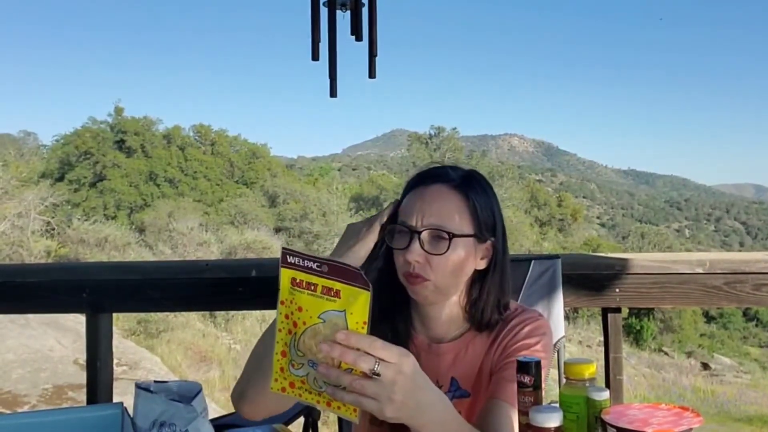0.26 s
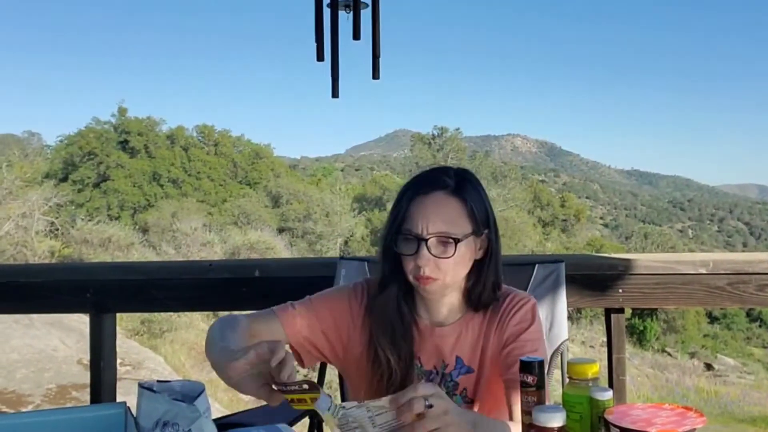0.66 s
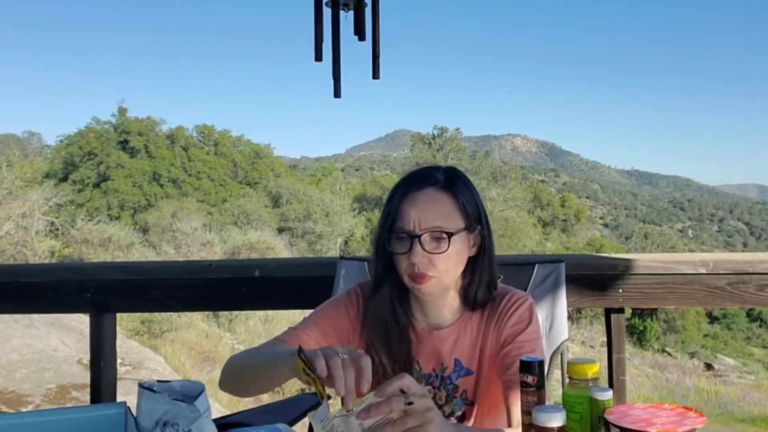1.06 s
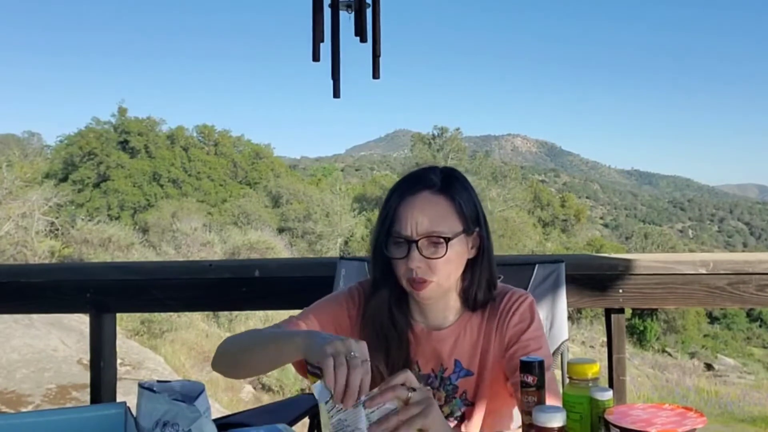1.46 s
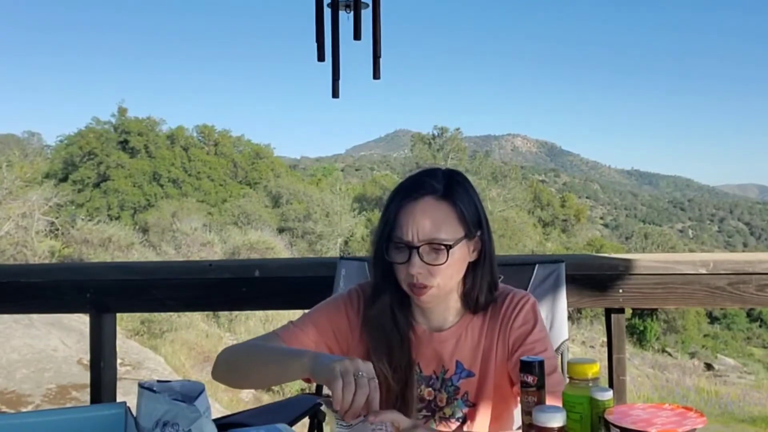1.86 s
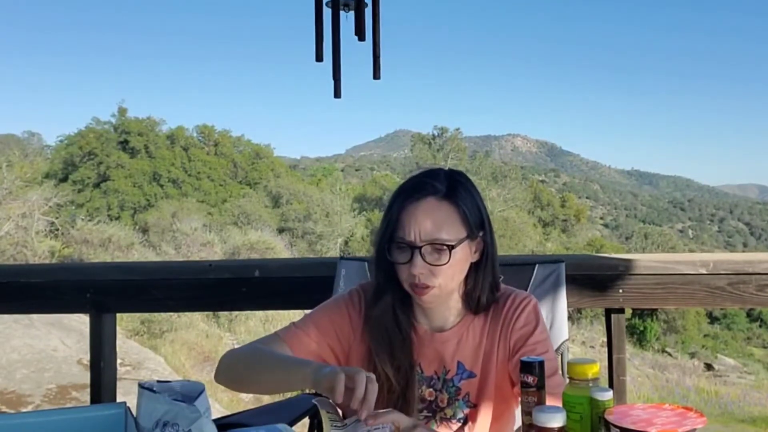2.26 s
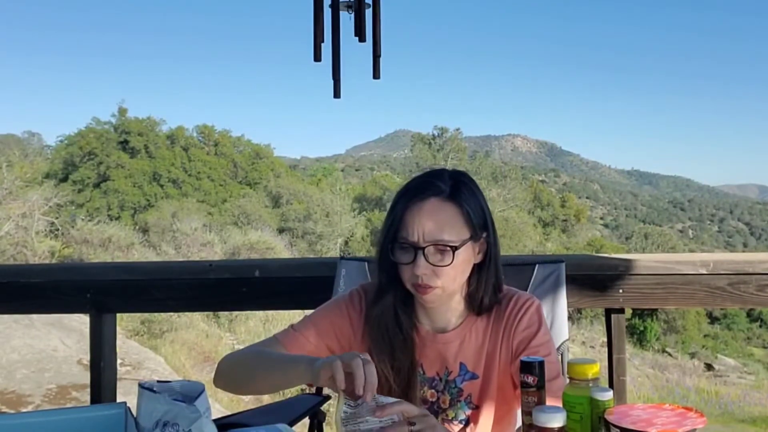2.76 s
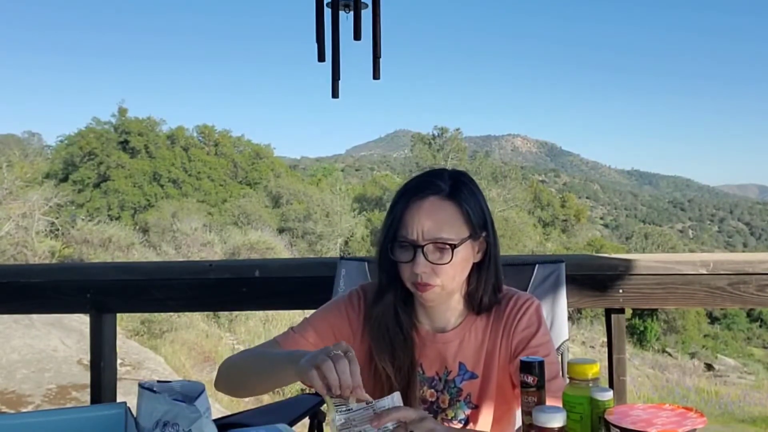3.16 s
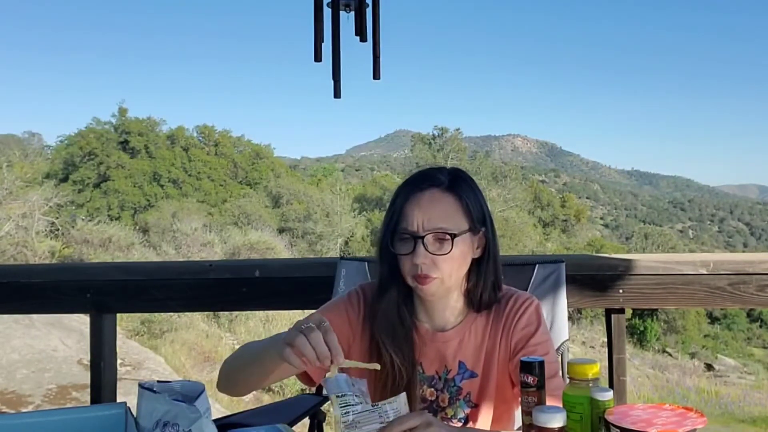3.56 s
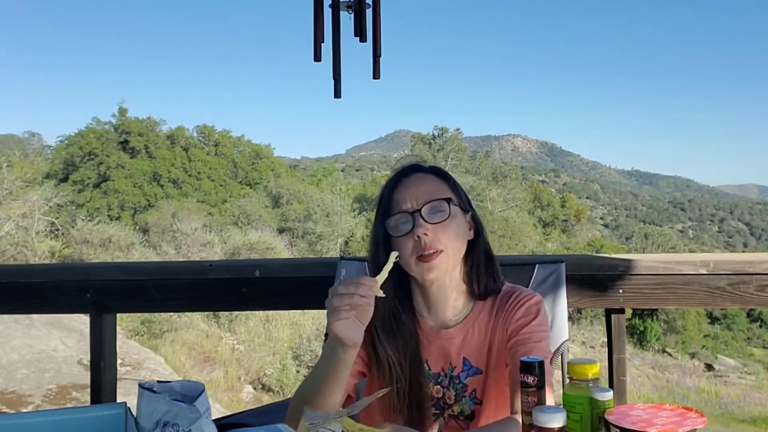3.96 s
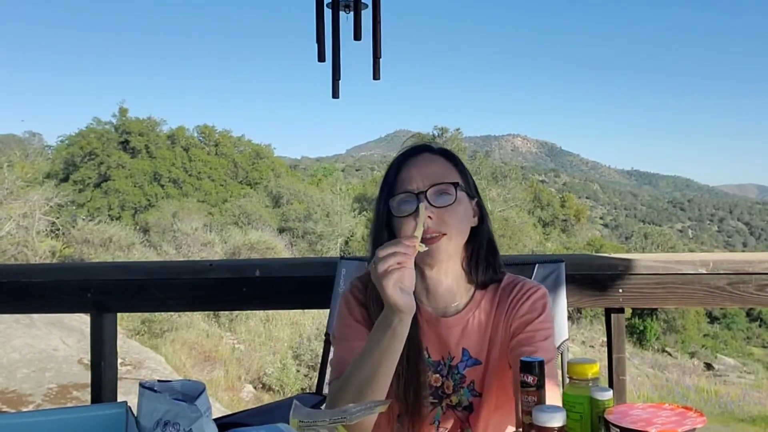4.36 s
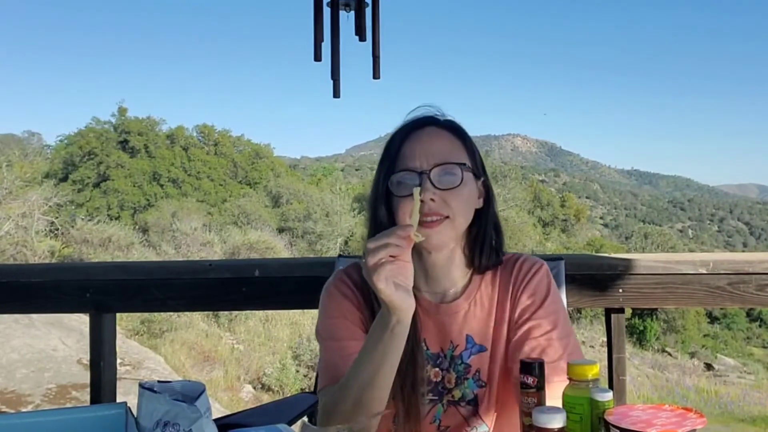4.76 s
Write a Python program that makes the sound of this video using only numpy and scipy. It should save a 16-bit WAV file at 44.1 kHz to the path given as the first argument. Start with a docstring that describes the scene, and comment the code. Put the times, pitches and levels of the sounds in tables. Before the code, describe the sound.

Close, dry crinkling of a snack bag comes in short uneven strokes, busiest around two seconds, with hard clicks and brief papery rings. After a quieter gap, soft thuds and rattles mark the bag being bumped and put down. Low, lumpy wind rumble and quiet open air run throughout, a far bird chirps thinly three times, and the porch adds a short early reflection.

```python
"""A porch in open country, heard by a two-port microphone: shaped noise makes the steady air, the microphone's
own hiss and the light wind. From 0.6 s fingers work a snack out of a stiff plastic bag about a metre away: strokes
rustle in swarms of tiny buckles and crackle, dull thuds ring the bag's modes, creases snap as damped clicks, taut
spots ping. From 1.4 s a small bird chirps three times far off, a wavering sine that slides up.
Bumping and setting down the bag go on to the last thud at 4.9 s, over the same wind and air."""
import sys
import numpy as np
from scipy import signal
from scipy.fft import rfft, irfft
from scipy.io import wavfile
from scipy.ndimage import uniform_filter1d

SR = 44100
rng = np.random.default_rng(int(sys.argv[2]) if len(sys.argv) > 2 else 0)


def unload_wav(signal):
    """Save mono or channel-first audio to the path in sys.argv[1] as 16-bit WAV at rate SR, clipped to [-1, 1]."""
    wavfile.write(
        sys.argv[1],
        SR,
        np.round(np.clip(np.atleast_2d(signal).T, -1, 1) * 32767).astype(np.int16),
    )


N = 221025
TIME = np.arange(N) / SR
FREQ = np.maximum(np.fft.rfftfreq(N, 1 / SR), 1)
TOP_HZ = 16000  # highest pitch of the film, and where the microphone's top is cut
PORTS = np.array([[1], [-1]])  # sign of a side signal at the left and the right port


def undb(db):
    """Decibels to gain."""
    return 10 ** (np.asarray(db) / 20)


def unit(x):
    """Scale to rms 1."""
    return x / np.sqrt(np.mean(x ** 2))


def decay(s, t60):
    """Exponential decay that loses 60 dB in t60 seconds."""
    return np.exp(-np.log(1000) * s / t60)


def colour(x, points):
    """Filter by a spectrum of (frequency [Hz], level [dB]) points, joined on a log frequency axis."""
    hz, db = np.transpose(points)
    gain = undb(np.interp(np.log(FREQ), np.log(hz), db))
    return irfft(rfft(x) * gain, N)


def add(out, t, x):
    """Mix the sound x into out from time t on."""
    i = int(t * SR)
    out[..., i:i + x.shape[-1]] += x[..., :N - i]


def pan(db):
    """Left and right gains for a level difference."""
    return undb(PORTS * db / 2)


def two_ports(x, apart):
    """Two ports share only a part of a sound: the common x[0] plus x[1] in opposite sign."""
    return (x[0] + apart * x[1] * PORTS) / np.sqrt(1 + apart ** 2)


def through(x, response):
    """Every channel of x through one response, at the same length."""
    return signal.fftconvolve(x, response[None])[:, :x.shape[1]]


# Steady outdoor air, with the microphone's own hiss in the treble: (frequency [Hz], relative level [dB per Hz])
AIR_AND_HISS = [(88, -59), (150, -10.5), (193, -7.5), (291, -6), (315, -9.5), (504, -6.5), (545, -10.5),
                (662, -11.5), (1060, -16.5), (1310, -20.5), (2270, -25.5), (9820, -36.5), (16000, -20.5)]


def air_and_hiss(level_db=-66, wide_hz=1200):
    """Faint steady outdoor air and microphone hiss: more alike at both ports in the bass, unrelated in the treble."""
    mid, side = (unit(colour(rng.standard_normal(N), AIR_AND_HISS)) for _ in range(2))
    side = colour(side, [(300, -8), (wide_hz, 0)])
    return (mid + side * PORTS) * undb(level_db)


# Rumble of wind on the microphone ports: (frequency [Hz], relative level [dB per Hz])
WIND_SPECTRUM = [(15, -14), (25, -5.5), (42, -0.5), (68, 1), (88, -6.5), (110, -14), (150, -27.5),
                 (250, -36.5), (600, -61.5)]
# Gusts on the ports: (time [s], hold [s], level before the wind's trim [dB], left over right [dB])
WIND_GUSTS = [(0.07, 0.41, -57, 5.5), (0.578, 0.042, -48, 0.5), (0.694, 0.096, -38, 7),
              (0.904, 0.14, -37.5, 0), (1.475, 0.063, -40, -1.5), (1.595, 0.042, -51.5, -9),
              (1.973, 0.65, -46, 5.5), (2.121, 0.067, -40, 2.5), (2.643, 0.22, -55.5, -2.5),
              (2.974, 0.019, -44.5, 6.5), (3.088, 0.04, -37.5, -0.5), (3.23, 0.095, -39, 4),
              (3.407, 0.36, -55, -4), (3.907, 0.19, -39.5, 2), (4.446, 0.13, -45.5, 7),
              (4.81, 0.24, -50.5, 0.5)]


def wind(apart=0.79, trim_db=-1, lull_db=-58.5, attack_s=0.027, release_s=0.045,
         lump_db=2.2, lumps_per_s=28, steady_size=1500):
    """Eddies buffet each port nearly on its own; gusts rise, hold and die away in lumps over a light breeze."""
    eddies = colour(two_ports(rng.standard_normal((2, N)), apart), WIND_SPECTRUM)
    # even out the noise's own swells, so that the gusts alone set the level
    eddies /= np.sqrt(uniform_filter1d(np.mean(eddies ** 2, axis=0), size=steady_size))
    power = undb(lull_db) ** 2  # the breeze between gusts
    for t, hold, db, pan_db in WIND_GUSTS:
        before = np.maximum(t - TIME, 0)
        after = np.maximum(TIME - t - hold, 0)
        swell = np.exp(-before / attack_s - after / release_s)
        power = power + (swell * undb(db) * pan(pan_db)) ** 2
    # pressure comes in lumps, dipping a little further than it rises
    lumps = np.interp(TIME * lumps_per_s, np.arange(N), rng.uniform(-1.19, 1, N)) * np.sqrt(3)
    return eddies * np.sqrt(power) * undb(trim_db + lump_db * lumps)


def facet(hz, width_hz, edge_db, edge_hz=900, size=512):
    """Click of one patch of film, of energy 1: a damped resonance plus the flat spectrum of the sharp fold."""
    f = np.maximum(np.fft.rfftfreq(size, 1 / SR), 1)
    resonance = (1 + ((f * f - hz * hz) / (f * width_hz)) ** 2) ** -2
    edge = undb(edge_db) ** 2 / (1 + (edge_hz / f) ** 2)
    cepstrum = irfft(np.log(resonance + edge))
    cepstrum[size // 2:] = 0  # causal: nothing sounds before the fold gives way
    cepstrum[0] = 0
    click = irfft(np.exp(rfft(cepstrum)))
    return click / np.linalg.norm(click)


def buckles(n, per_s, spread_db, slide):
    """Swarm of tiny buckles of very unequal size over the hiss of sliding film, scaled to rms 1."""
    chance = rng.random(n)
    size = np.minimum(rng.exponential(size=n), 4)
    pops = (chance < per_s / SR) * undb(spread_db * size) * rng.choice([-1, 1], n)
    hiss = rng.standard_normal(n)
    return unit(unit(pops + 1e-9) + slide * hiss)


def ring(modes, detune=0.027, size=4000):
    """Response of damped modes (frequency [Hz], level [dB], t60 [s]) to one push, of energy 1."""
    hz, db, t60 = np.transpose(modes)[:, :, None]
    s = np.arange(size) / SR
    hz = hz * (1 + detune * rng.standard_normal(hz.shape))  # the bag never has quite the same shape twice
    tones = np.sin(2 * np.pi * (hz * s + rng.random(hz.shape)))
    response = np.sum(undb(db) * decay(s, t60) * tones, axis=0)
    return response / np.linalg.norm(response)


def sheet(x, hz, ring_db=-13, t60=0.026, octaves=0.724, count=24):
    """The taut film around a fold rings along; the bag keeps changing shape, so its modes are new every time."""
    pitches = np.minimum(hz * 2 ** (octaves * rng.standard_normal(count)), TOP_HZ)
    modes = [(f, -abs(np.log2(f / hz)), t60) for f in pitches]
    return x + undb(ring_db) * through(x, ring(modes))


def effort_db(s, rise, fall, drop_db=14, tail=0.88):
    """Level of a swell, s seconds from its height: a rounded rise and a long fall."""
    return -drop_db * np.where(s < 0, (s / rise) ** 2, np.abs(s / fall) ** tail)


# Swells of rustling about a metre from the microphone: strokes of the fingers that crumple the film,
# except the row at 2.489 s, a faint blurred trace of the bird's call
# (time of the height [s], rise by 14 dB [s], fall by 14 dB [s], relative level [dB], pitch [Hz], sharp edge [dB])
STROKES_AND_BIRD_TRACE = [(0.649, 0.016, 0.026, -42.5, 2510, -1), (0.945, 0.026, 0.025, -49, 6230, -3),
                          (1.061, 0.015, 0.068, -62, 1920, -12), (1.188, 0.015, 0.054, -58.5, 2400, -4),
                          (1.288, 0.042, 0.091, -57.5, 2270, -8), (1.343, 0.015, 0.01, -46.5, 3610, -36),
                          (1.568, 0.016, 0.032, -53, 2120, 1), (1.656, 0.069, 0.045, -50, 2670, -18),
                          (1.79, 0.08, 0.39, -46.5, 2202, -12.5), (1.905, 0.02, 0.057, -39, 2685, -4.5),
                          (2.062, 0.056, 0.028, -46, 2400, -12), (2.382, 0.053, 0.032, -58.5, 2630, -20),
                          (2.489, 0.065, 0.37, -67.5, 2900, -1), (2.881, 0.044, 0.018, -59.5, 4240, -33),
                          (2.956, 0.045, 0.03, -45.5, 2380, -24), (3.165, 0.063, 0.1, -56, 1840, -13),
                          (3.385, 0.027, 0.096, -57, 2590, -5), (3.551, 0.11, 0.19, -65.5, 3090, 2)]


def rustle(per_s=900, spread_db=3.0, slide=0.35, apart=0.42, pan_db=1, trim_db=-4.5,
           scatter_octaves=0.634, patches=8):
    """Each swell grows and dies away as swarms of buckles in several patches of different pitch."""
    out = np.zeros((2, N))
    for t, rise, fall, db, hz, edge_db in STROKES_AND_BIRD_TRACE:
        s = np.arange(-1.5 * rise, 3.1 * fall, 1 / SR)
        effort = undb(db + trim_db + effort_db(s, rise, fall))
        width_hz = 1.73 * hz
        for pitch in hz * 2 ** np.linspace(-scatter_octaves, scatter_octaves, patches):
            swarm = two_ports([buckles(len(s), per_s / patches, spread_db, slide) for _ in range(2)], apart)
            patch = through(swarm * effort, facet(pitch, width_hz, edge_db))
            add(out, t + s[0], sheet(patch, pitch) / np.sqrt(patches))
    return out * pan(pan_db)


# What the bag rings with under rubs and blows, before detuning: (frequency [Hz], level [dB], t60 [s])
BODY_MODES = [(215.6, -8, 0.12), (265.4, -7, 0.06), (328, 3, .055), (376, 2, 0.05), (432, -9, 0.04),
              (541, -15, 0.07), (660, -7, .03), (980, -5, 0.044), (1210, -4, 0.06), (1350, -7, 0.06),
              (1900, -3, 0.04)]


def shaking(rustling, level_db=-13):
    """Rubbing also shakes the bag as a whole: noise that follows the rustle's level drives the body modes."""
    pressure = np.sqrt(np.abs(uniform_filter1d(rustling[0] ** 2, size=400)))
    force = pressure * rng.standard_normal(N)
    return undb(level_db) * through(force[None], ring(BODY_MODES))


def crackles(per_s=110, octaves=0.55, width_share=0.082, spread_db=2.5, pan_spread_db=3, pan_db=1.0,
             soften_db=-24, count=40, size=2000):
    """Lesser clicks, as of creases giving way, at uneven steps of each swell, each with its own pitch and direction."""
    out = np.zeros((2, N))
    for t, rise, fall, db, hz, edge_db in STROKES_AND_BIRD_TRACE:
        times = (np.arange(count) + rng.random(count)) / per_s - rise
        for s, (loud, high, side) in zip(times, rng.standard_normal((count, 3))):
            pitch = min(hz * 2 ** (octaves * high), TOP_HZ)
            click = facet(pitch, width_share * pitch, edge_db + soften_db, size=size)
            level_db = db + effort_db(s, rise, fall) + spread_db * loud
            gain = np.sqrt(SR / 1000) * undb(level_db)  # level over one millisecond
            add(out, t + s, click * gain * pan(pan_db + pan_spread_db * side))
    return out


# Blows on the bag and what lies under it: (time [s], relative thud level [dB], rattle of the contents [dB],
# rattle's fall by 18 dB [s], rattle pitch [Hz])
BAG_BLOWS = [(0.641, -49, -61, 0.11, 1340), (0.8355, -35, -38.5, 0.038, 1750),
             (1.286, -54, -66, 0.026, 1000), (1.622, -42, -62, 0.15, 1310), (1.904, -57, -66, 0.017, 1200),
             (2.953, -43.5, -52.5, 0.046, 1340), (3.18, -46.5, -59.5, 0.031, 1320),
             (4.417, -34, -42, 0.067, 1900), (4.453, -38.5, -47, 0.077, 960),
             (4.518, -49, -57.5, 0.11, 980), (4.583, -43, -55, 0.073, 1190), (4.593, -41, -48, 0.084, 1290),
             (4.722, -36, -40.5, 0.084, 1800), (4.913, -40.5, -43, 0.052, 1890)]


def bumps(per_s=900, spread_db=1.7, slide=0.55, breadth=2.04, edge_db=-26, drop_db=18, apart=1.0,
          attack_s=0.0012, blow_db=24, drag_db=-11, size=12000):
    """A soft blow rings the body modes and drags on briefly, while film and contents rattle."""
    out = np.zeros((2, N))
    s = np.arange(size) / SR
    soft_onset = 1 - np.exp(-s / attack_s)
    for t, thud_db, rattle_db, fall, rattle_hz in BAG_BLOWS:
        fade = undb(-drop_db * s / fall)
        force = undb(drag_db) * fade * rng.standard_normal((1, size))
        force[:, 0] += undb(blow_db)
        thud = through(force, ring(BODY_MODES))
        swarm = two_ports([buckles(size, per_s, spread_db, slide) for _ in range(2)], apart)
        rattle = through(swarm * fade, facet(rattle_hz, breadth * rattle_hz, edge_db))
        add(out, t, (undb(thud_db) * thud + undb(rattle_db) * rattle) * soft_onset)
    return out


# The loudest creases that snap through:
# (time [s], relative level [dB], pitch of the facet [Hz], width [Hz], sharp edge [dB])
CREASE_SNAPS = [(0.6444, -43.5, 2960, 3100, -13), (0.689, -47.5, 2340, 700, -37),
                (0.8152, -34, 2700, 1600, -11), (0.8363, -28, 1587, 1640, -19.5),
                (1.0536, -57.5, 1550, 2700, -27), (1.2655, -45.5, 2470, 800, -5),
                (1.2864, -51.5, 1920, 4300, -40), (1.3423, -41.5, 3640, 6600, -40),
                (1.5575, -45.5, 1330, 3000, -15), (1.5715, -45.5, 2600, 3000, 4),
                (1.6128, -40.5, 2200, 1800, -40), (1.618, -41, 1960, 2600, -20),
                (1.634, -39, 2290, 1800, -16), (1.6442, -23, 3300, 2460, -10.5),
                (1.6642, -40, 1450, 1850, -30), (1.751, -39.5, 1950, 2600, -12),
                (1.889, -45, 2060, 2600, -12), (1.9099, -31, 2620, 2640, -10.5),
                (1.9665, -36, 1915, 1870, -39), (2.0527, -33.5, 1963, 1300, -20),
                (2.06, -34.5, 2890, 5640, -21), (2.2012, -34, 2720, 1880, -57),
                (2.3463, -43, 1780, 3200, -43), (2.364, -38.5, 3050, 3900, -16),
                (2.842, -43, 2084, 2050, -33), (2.934, -31.5, 3430, 4380, -42),
                (2.95, -39.5, 1740, 2200, -31), (2.9655, -36, 1800, 3250, -45),
                (3.1794, -43.5, 2410, 2420, -17), (3.8386, -40, 3910, 4260, -34),
                (3.916, -37.5, 2250, 6500, -8.5), (4.795, -31, 2530, 2080, -13)]


def snaps(flutter_s=0.00083, flutter_db=-2.0, apart=0.54, pan_db=1, size=4000):
    """Each crease pops through once; the film around it flutters for a few milliseconds."""
    out = np.zeros((2, N))
    s = np.arange(size) / SR
    fade = (1 - np.exp(-s / flutter_s)) * np.exp(-s / flutter_s)
    for t, db, hz, width_hz, edge_db in CREASE_SNAPS:
        push = two_ports(rng.standard_normal((2, size)), apart) * fade
        push *= undb(flutter_db) / np.linalg.norm(push[0])
        push[:, 0] = 1  # the pop itself
        click = sheet(through(push, facet(hz, width_hz, edge_db)), hz)
        # bending waves are dispersive: an all-pass filter spreads the peak a little
        click = signal.lfilter([.6, -1.4, 1], [1, -1.4, .6], click)
        gain = np.sqrt(SR / 1000) * undb(db)  # level over one millisecond
        add(out, t - 5 / SR, click * gain * pan(pan_db))
    return out


# Taut spots of film that ring on after a snap:
# (time [s], centre frequency [Hz], starting level [dB], t60 [s])
TAUT_SPOTS = [(0.689, 2335, -61.5, 0.3), (.69, 4370, -63.5, 0.11), (1.6435, 3510, -44, 0.076),
              (2.1996, 2950, -43, 0.038), (2.3645, 3550, -40, 0.029), (3.915, 1103, -50, 0.091),
              (4.796, 2785, -51, .11)]


def pings(detune=0.03, size=9000, count=5):
    """A taut spot rings in a cluster of close modes that beat against each other."""
    out = np.zeros(N)
    s = np.arange(size) / SR
    for t, hz, db, t60 in TAUT_SPOTS:
        pitch = hz * (1 + detune * rng.standard_normal((count, 1)))
        cluster = np.sin(2 * np.pi * (pitch * s + rng.random((count, 1)))).sum(axis=0)
        add(out, t, unit(cluster) * undb(db) * decay(s, t60))
    return out


# Calls of the far bird: (time [s], level to which the contour is added [dB])
BIRD_CALLS = [(1.448, -79), (2.25, -72), (2.457, -70)]
# Contour of one call: (time into the call [s], pitch before wavering [Hz], relative level [dB])
CALL_CONTOUR = [(0, 3330, -5.5), (.01, 3470, -1.5), (0.026, 3950, 3), (0.043, 4250, -2), (.08, 4300, -3),
                (.1, 4000, -30)]


def bird(waver=0.015):
    """A far bird: a thin, wavering whistle that slides up and holds."""
    out = np.zeros(N)
    knots, hz, db = np.transpose(CALL_CONTOUR)
    s = np.arange(0, knots[-1], 1 / SR)
    for t, call_db in BIRD_CALLS:
        drift = unit(uniform_filter1d(rng.standard_normal(len(s)), size=120))
        pitch = np.interp(s, knots, hz) * (1 + waver * drift)
        whistle = np.sqrt(2) * np.sin(2 * np.pi * np.cumsum(pitch) / SR)
        add(out, t, whistle * undb(call_db + np.interp(s, knots, db)))
    return out


# One clear early echo about 11 ms after the sound, from a near surface, as two nearly coinciding rows;
# the row at -77 dB is inaudible: (delay before a tiny random lag [s], level before colouring [dB])
EARLY_ECHO = [(.0042, -77), (0.0111, -19.5), (0.0109, -14.5)]
# Colour of the porch's reverberation: (frequency [Hz], gain [dB])
PORCH_COLOUR = [(100, -22), (350, -0.5), (700, 1.5), (1400, 1.5), (3000, 4), (7000, 5), (16000, 1)]


def porch(x, t60=0.17, tail_db=-9, build_s=0.00037, apart=1.0, wide_hz=1300, size=14000):
    """A near surface gives one early echo within a short diffuse tail that escapes into the open."""
    s = np.arange(size) / SR
    mid, side = rng.standard_normal((2, size))
    # long waves reach both ports alike
    side = signal.sosfilt(signal.butter(1, wide_hz, "high", fs=SR, output="sos"), side)
    tail = two_ports([mid, side], apart) * decay(s, t60) * (1 - np.exp(-s / build_s))
    response = unit(tail) / np.sqrt(size) * undb(tail_db)
    for delay, db in EARLY_ECHO:
        for port in response:
            add(port, delay + 0.00019 * rng.random(), undb([db]))
    reverberation = signal.fftconvolve(x, response, axes=1)[:, :N]
    return x + colour(reverberation, PORCH_COLOUR)


def bag():
    """The film's rustle, crackles, snaps and pings, with the bag shaken as a whole in step with the rustle."""
    rustling = rustle()
    return rustling + shaking(rustling) + crackles() + snaps() + pings()


# Treble of the right port against the left for sounds on the porch: (frequency [Hz], gain [dB])
RIGHT_SHADE = [(1500, 0.5), (3000, -0.04), (8000, 0), (14000, -2)]


def scene(lag_s=1.2e-5):
    """Bag and bird reach the left port a hair later and the right one duller; wind, air and hiss are added."""
    left, right = porch(bag() + bumps() + bird())
    left = irfft(rfft(left) * np.exp(-2j * np.pi * FREQ * lag_s), N)
    return air_and_hiss() + wind() + np.array([left, colour(right, RIGHT_SHADE)])


# Response of the microphone: (frequency [Hz], gain [dB])
MIC_RESPONSE = [(100, 1.5), (7800, -4), (9000, -14), (10500, -12), (12500, -8.5), (16000, -14.5)]


def record(dry):
    """The microphone dips around 10 kHz and a steep low-pass cuts the top."""
    top_cut = signal.ellip(10, .1, 80, TOP_HZ, fs=SR, output="sos")
    return signal.sosfilt(top_cut, colour(dry, MIC_RESPONSE))


dry = scene()
out = record(dry)
unload_wav(out)
```